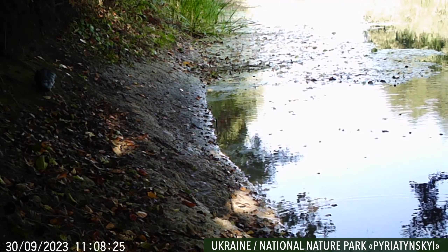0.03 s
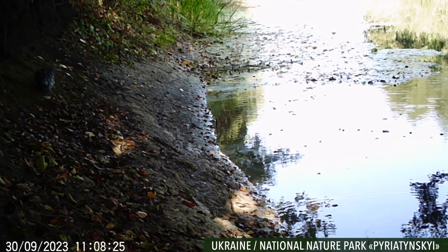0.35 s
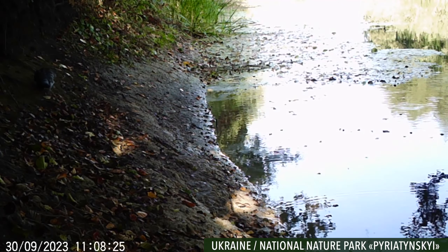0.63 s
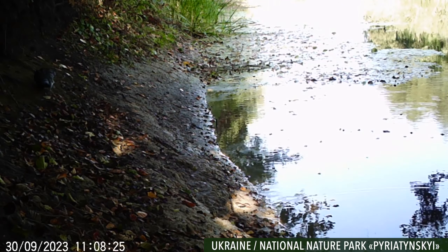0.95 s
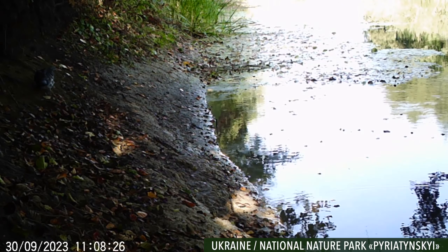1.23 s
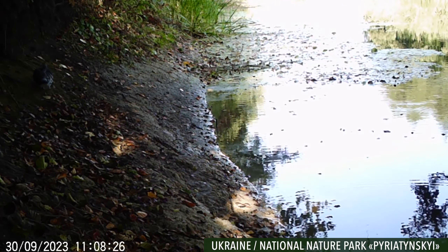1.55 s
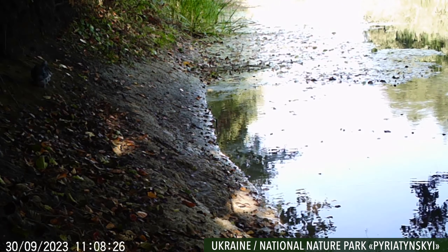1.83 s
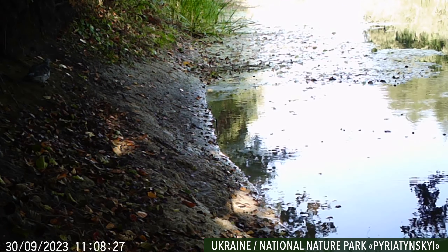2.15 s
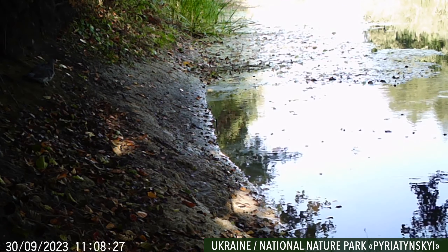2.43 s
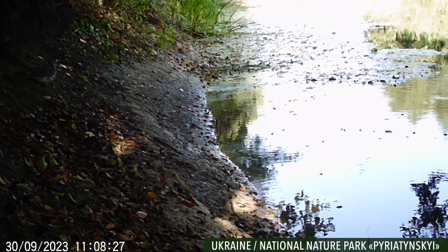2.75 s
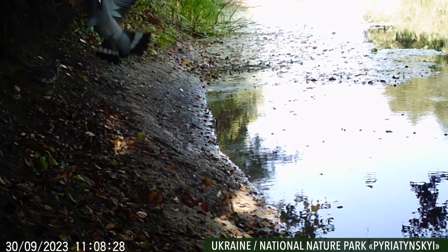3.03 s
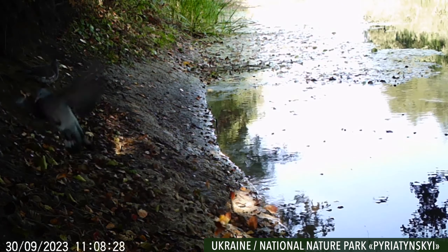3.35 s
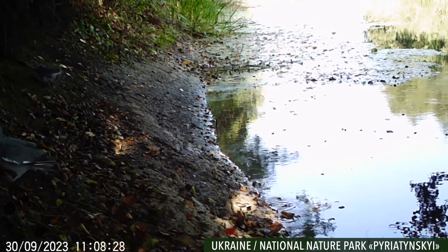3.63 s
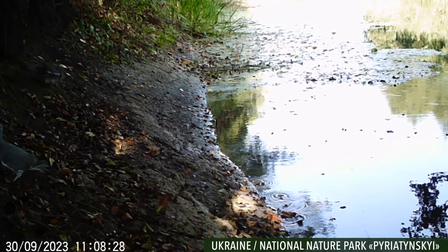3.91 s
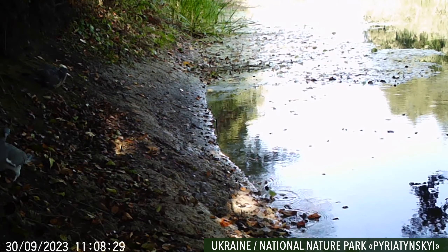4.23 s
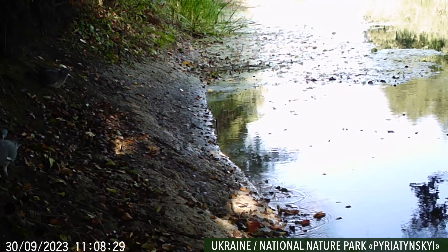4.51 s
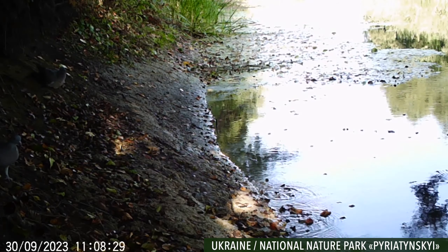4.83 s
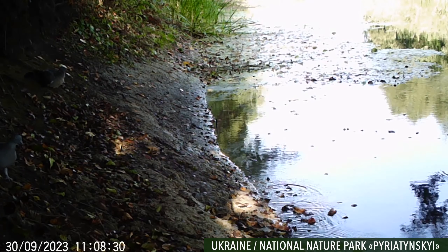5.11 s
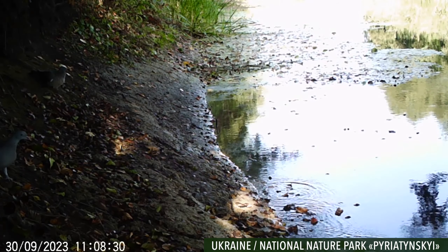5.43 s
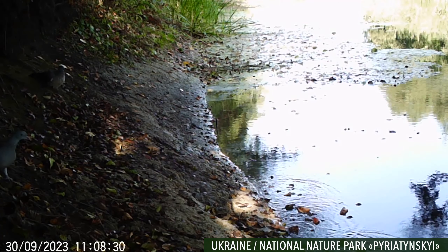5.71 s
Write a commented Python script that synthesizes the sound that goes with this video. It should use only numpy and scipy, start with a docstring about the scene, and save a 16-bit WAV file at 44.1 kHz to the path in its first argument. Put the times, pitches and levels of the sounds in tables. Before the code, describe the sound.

Pigeons stir on the leafy bank of a woodland pond. A rattling croak and faint small bird chirps come first, then stuttering croaks and dull wingbeats among snapping twigs. A bird flaps in and lands with a reedy honk, rustling dry leaves and sending grit pattering onto the water. A short yelp and a few snaps follow. A trail camera microphone adds steady hiss and a thin whine.

```python
"""Pigeons croak, coo, honk and beat their wings on the leafy bank of a woodland pond.
Their throats make rough, pulsing tones and their wings push dull gusts of air. Dry leaves
rustle and snap as they are stirred, and blown leaves and grit patter onto the water.
Small birds chirp further off. A trail camera hears it all through two unequal microphone
openings (ports), over a steady hiss, a far shrill sound and its own thin whine."""
import sys
import numpy as np
from scipy import signal
from scipy.fft import rfft, irfft, next_fast_len
from scipy.io import wavfile
from scipy.ndimage import uniform_filter1d

SR = 44100
rng = np.random.default_rng(int(sys.argv[2]) if len(sys.argv) > 2 else 0)


def to_wav(s):
    """Save 16-bit WAV."""
    ch = np.atleast_2d(s).T  # columns
    pcm = np.round(np.clip(ch, -1, 1) * 32767)  # PCM
    wavfile.write(sys.argv[1], SR, pcm.astype(np.int16))


N = 258867
T = np.arange(N) / SR


def undb(db):
    """Turn decibels into a number to multiply by."""
    return 10 ** (np.asarray(db) / 20)


def unit(x):
    """Scale a signal to an average power of 1."""
    return x / np.sqrt(np.mean(x ** 2))


def cut(x, kind, hz, order):
    """Filter a signal: "low", "high" and "band" keep that part, "bandstop" removes it."""
    return signal.sosfilt(signal.butter(order, hz, kind, fs=SR, output="sos"), x)


def colour(x, points):
    """Shape the tone along (pitch_hz, level_db) points, with a filter that rings only after a click."""
    hz, db = np.transpose(points)
    size = next_fast_len(N + SR // 2, True) // 2 * 2
    gain = unit(undb(np.interp(np.log(np.fft.rfftfreq(size, 1 / SR) + 1), np.log(hz), db)))
    cepstrum = irfft(np.log(gain))
    cepstrum[1:size // 2] *= 2
    cepstrum[size // 2 + 1:] = 0
    return irfft(rfft(x, size) * np.exp(rfft(cepstrum)))[..., :N]


def ring(x, hz, width_hz):
    """Let a signal ring at one pitch; the narrower the width, the longer it rings."""
    return signal.lfilter(*signal.iirpeak(min(hz, SR / 3), hz / width_hz, fs=SR), x)


def wander(per_s):
    """A random drift of about 1 either way, heading for a new value per_s times a second."""
    return unit(np.interp(T * per_s, np.arange(N // 10), rng.standard_normal(N // 10)))


def swell(start_s, length_s, rise_s, fade_s):
    """A loudness curve that rises, holds, then fades away."""
    age = T - start_s
    return np.clip(age / rise_s, 0, 1) * np.exp(-np.maximum(age - length_s, 0) / fade_s)


def add(track, start_s, x):
    """Mix a sound into the track at its start time."""
    i = max(int(start_s * SR), 0)
    track[..., i:i + x.shape[-1]] += x[..., :N - i]


def place(x, pan_db):
    """Both ports share the left's bass; the right is then pan_db quieter (louder if negative)."""
    left, right = x * np.ones((2, N))
    right = right + cut(left - right, "low", 1100, order=1)
    return np.array([left, right * undb(-pan_db)])


def tiny_cracks(size, spread_db, density):
    """Cracks of very unequal strength: a shared stream plus one for each port."""
    cracks = rng.standard_normal((3, size)) * (rng.random((3, size)) < density) / np.sqrt(density)
    cracks *= undb(spread_db * np.minimum(rng.exponential(size=(3, size)), 4))
    return unit(cracks[0] + 2.25 * cracks[1:])


def ringing_ticks(low_hz, high_hz, width_hz, density, count=44):
    """Scattered ticks, each ringing at one of several random pitches."""
    pitches = low_hz * (high_hz / low_hz) ** ((np.arange(count) + rng.random(count)) / count)
    rings = (ring(rng.standard_normal(N) * (rng.random(N) < density), hz, width_hz) for hz in pitches)
    return unit(sum(rings) + 1e-12)


def throat(rows, pulses_per_s, depth, sag, overtone_db, jitter):
    """A pulsing throat tone that follows (time_s, pitch_hz, level_db) rows and sags in each pulse."""
    times, pitches, levels = np.transpose(rows)
    hz, db = np.interp(T, times, pitches), np.interp(T, times, levels)
    sounding = uniform_filter1d(1. * ((T > times[0]) & (T < times[-1])), SR // 1000)
    flutter = 2 * np.pi * np.cumsum(pulses_per_s * sounding) / SR
    phase = 2 * np.pi * np.cumsum(hz * (1 - sag * np.sin(flutter) + jitter * wander(480))) / SR
    tone = sum(undb(overtone_db * k) * np.sin((k + 1) * phase) for k in range(3))
    pulses = np.exp(depth * (np.cos(flutter) - 1))
    return tone * pulses * undb(db) * sounding


# The tone of the hiss, from bass to treble: pitch_hz, relative_level_db
HISS_TONE = [(40, -32), (80, -3.5), (130, 3), (350, 6), (700, 4.5), (970, 9), (1400, -0.5), (2400, -4.5),
             (3400, -3.5), (4500, -0.5), (6000, -6), (7000, 2), (8800, 3.5), (10300, -1.5), (12500, -8),
             (15500, -14)]
# How much quieter the hiss is on the right: pitch_hz, quieter_db
HISS_BALANCE = [(60, 11.5), (400, 8), (1000, 19), (2400, 11.5), (8000, 12.5), (15000, 19)]

def hiss(level_db=-41):
    """A steady hiss, alike at both ports only in the bass."""
    own_treble = cut(rng.standard_normal((2, N)), "high", 2500, order=1)
    shared = rng.standard_normal(N)
    noise = colour(shared + own_treble + .15 * rng.standard_normal((2, N)), HISS_TONE)
    noise *= undb(level_db + .79 * wander(27)) / noise[0].std()
    quieter_db = np.interp(np.fft.rfftfreq(N, 1 / SR), *np.transpose(HISS_BALANCE))
    return np.array([noise[0], irfft(rfft(noise[1]) * undb(-quieter_db), N)])


def whine(pitch_hz=5512, level_db=-50.5):
    """The camera's electronics give one thin, steady tone."""
    return place(undb(level_db) * np.sin(2 * np.pi * pitch_hz * T), pan_db=15)


def shrill(pitch_hz=6770, width_hz=620, level_db=-45.5, end_s=4.9):
    """A high, flickering band of noise from far off, perhaps insects; it fades out near the end."""
    band = ring(ring(rng.standard_normal(N), pitch_hz, width_hz), pitch_hz, 2 * width_hz)
    flickering = unit(band * undb(2.3 * wander(24)))
    fade = np.clip((end_s - T) * 2, 0, 1)
    return place(flickering * undb(level_db) * fade, pan_db=31)


# Small birds in the trees: start_s, length_s, start_hz, end_hz, level_db, buzz (share of the pitch)
BIRD_CHIRPS = [(0.0, 0.034, 4160, 4300, -30, 0.02), (0.238, 0.033, 2720, 3080, -35, 0.066),
               (0.267, 0.066, 3750, 4430, -35, 0.014), (0.992, 0.065, 7760, 6990, -27, .02),
               (2.302, 0.034, 3910, 3770, -28, 0.012)]

def chirps():
    """Thin whistles that slide quickly, then settle on their last pitch; a fast waver adds buzz."""
    out, waver = np.zeros(N), wander(600)
    for start_s, length_s, start_hz, end_hz, db, buzz in BIRD_CHIRPS:
        size = int(length_s * SR)
        slide_hz = end_hz + (start_hz - end_hz) * np.linspace(1, 0, size) ** 2
        phase = 2 * np.pi * np.cumsum(slide_hz * (1 + buzz * waver[:size])) / SR
        add(out, start_s, undb(db) * np.sqrt(np.hanning(size)) * np.sin(phase))
    return place(out, pan_db=13)


# The path of one rattling croak: time_s, pitch_hz, level_db
RATTLE_PATH = [(0.093, 892, -32), (0.125, 917, -22.5), (0.165, 890, -18), (0.2, 843, -19.5),
               (0.28, 822, -38)]

def rattle():
    """The throat chops an almost pure tone into deep pulses."""
    return throat(RATTLE_PATH, pulses_per_s=85, depth=1.1, sag=.1, overtone_db=-49, jitter=.0357)


# The loudest leaves and twigs that snap: start_s, level_db, pitch_hz, rise_s, fade_s (to fall 60 dB)
TWIG_SNAPS = [(0.445, -30.5, 4700, .003, 0.042), (1.036, -29, 2930, .003, 0.033),
              (1.0645, -19, 4350, 0.0079, 0.037), (1.069, -25.5, 2630, .004, .02),
              (1.1188, -15.5, 4700, 0.00098, 0.058), (1.167, -26.5, 4160, .004, 0.062),
              (1.25, -29, 2560, 0.0071, 0.089), (1.272, -25, 4000, 0.011, 0.1),
              (1.650, -20.5, 5600, .003, 0.035), (2.2619, -20, 1700, 0.00089, 0.012),
              (2.621, -17, 4500, .008, 0.068), (2.648, -15, 8400, .001, 0.019),
              (2.744, -22, 7700, .001, .01), (2.924, -21, 5400, .003, .03), (3.018, -15, 4670, .006, .035),
              (3.128, -14.5, 4850, .01, 0.031), (3.612, -10.5, 8600, .002, 0.01),
              (3.786, -14.5, 4600, .002, 0.046), (4.272, -16, 4150, .009, 0.031),
              (4.3603, -20, 3300, 0.00076, 0.0063), (4.802, -17, 5350, .001, 0.023),
              (4.878, -26, 4600, .002, 0.014), (4.9207, -23, 2930, 0.002, 0.043),
              (5.053, -22, 5500, .001, 0.032), (5.316, -35.5, 2900, 0.0027, .03),
              (5.503, -35, 2030, .002, .016), (5.594, -22, 2750, 0.0034, 0.021),
              (5.611, -18, 6920, .006, 0.091), (5.6688, -21, 3000, 0.00133, 0.032),
              (5.679, -22, 3750, .001, 0.0067), (5.716, -32, 1770, .003, .02),
              (5.7363, -16.5, 3400, .0013, .024)]
# The tones that ring in each snap: pitch_ratio (times the snap's pitch), relative_level_db
SNAP_TONES = [(.68, -6), (.88, 1), (1.06, 15.5), (1.58, 2.5), (1.85, 1)]

def snaps(settle_db=-15, settle_s=.33, width_share=.076, detune=.037):
    """A leaf or twig gives way: cracks build up, ring and fade, then the fallen leaves settle."""
    out, t = np.zeros((2, N)), T[:SR // 6]
    for start_s, db, hz, rise_s, fade_s in TWIG_SNAPS:
        rise, age = np.minimum(t / rise_s, 1) ** 2, np.maximum(t - rise_s, 0)
        burst = tiny_cracks(len(t), spread_db=3, density=.55) * rise * undb(-60 * age / fade_s)
        settling = tiny_cracks(len(t), spread_db=5, density=.77) * rise
        settling *= undb(settle_db - 60 * age / settle_s)
        # the quicker the rise, the harder the first crack
        burst[:, int(rise_s * SR)] += undb(17) * np.exp(1 - rise_s / .00087)
        pitches = hz * (1 + detune * (2 * rng.random(len(SNAP_TONES)) - 1))
        tones = sum(undb(tone_db) * ring(burst + settling / 2, ratio * pitch, width_share * pitch)
                    for (ratio, tone_db), pitch in zip(SNAP_TONES, pitches))
        cracks = ring(burst + settling, hz, width_hz=hz)
        snap = cut(unit(tones) + undb(-6) * unit(cracks), "band", [1300, 9500], order=4)
        loudest = np.sqrt(uniform_filter1d(snap[0] ** 2, SR // 500).max())
        add(out, start_s, snap * undb(db) / loudest)
    return place(out, pan_db=10)


# Feet and wings scuff the leaves: start_s, length_s, level_db, brightness_db
LEAF_SCUFFS = [(1.075, 0.083, -34.5, -5), (1.251, 0.053, -32.5, -8), (1.575, 0.24, -31, -7.5),
               (1.84, 0.2, -34, -8), (2.124, 0.15, -34, -20), (2.534, 0.1, -31.5, 7),
               (2.589, 0.12, -29.5, 8), (2.702, 0.071, -31.5, -8), (2.825, 0.11, -26.5, -1.5),
               (2.915, 0.12, -18.7, -0.5), (3.067, 0.069, -26, -8), (3.184, 0.087, -29, -9),
               (3.325, 0.11, -21, -8.5), (3.45, 0.091, -27.5, 2), (3.562, 0.13, -25.5, -1.5),
               (3.688, 0.15, -24, -8.5), (3.867, 0.14, -20.5, -19), (4.128, 0.055, -29.5, -11),
               (4.241, 0.07, -27, -9), (4.495, 0.049, -32, -2), (4.608, 0.034, -33.5, -10),
               (4.899, 0.053, -36.5, -23), (5.728, 0.019, -37, -14)]

def stirring(wing_force):
    """Scuffs, shuffling feet and the draught of the wings set the rustle's strength and brightness."""
    parts = [(undb(db) * swell(start_s, length_s, rise_s=.024, fade_s=.029), bright_db)
             for start_s, length_s, db, bright_db in LEAF_SCUFFS]
    shuffle = undb(-39.5) * swell(start_s=1.4, length_s=3.44, rise_s=.024, fade_s=.36)
    draught = undb(-8.5) * wing_force
    parts += [(shuffle, -2.5), (draught, -10)]
    power = sum(gain ** 2 for gain, _ in parts) + 1e-18
    return np.sqrt(power), sum(gain ** 2 * bright_db for gain, bright_db in parts) / power


# The tone of dry leaves: pitch_hz, relative_level_db
LEAF_TONE = [(820, -36), (1400, -17), (2670, -1), (3450, -3), (4170, -4), (4940, 1), (5450, -8.5),
             (6650, 0), (7420, -3), (9040, -1), (9800, -2.5), (10600, -1), (11500, -9.5), (12800, -11.5),
             (13900, -15.5), (15000, -85)]

def rustle(wing_force, flurry_limit_db=7.5):
    """Dry leaves crackle in uneven flurries; single leaves ring, and stiff ones crunch one by one."""
    strength, bright_db = stirring(wing_force)
    blades = ringing_ticks(low_hz=2200, high_hz=10000, width_hz=150, density=.0015)
    # gentle stirring breaks up into separate cracks
    cracks = tiny_cracks(N, spread_db=2.6, density=.002 + 1.3 * strength)
    crunch = ringing_ticks(low_hz=3800, high_hz=4800, width_hz=330, density=.0007, count=6)
    crackle = colour(cracks + undb(-1) * blades, LEAF_TONE) + undb(-8) * crunch
    top, body = cut(crackle, "high", 6500, order=2), cut(crackle, "low", 6000, order=2)
    bright = undb(bright_db + 5)
    # the two halves swing opposite ways where they meet, so subtracting joins them
    stirred = (unit(body) - bright * unit(top)) / np.sqrt(1 + bright ** 2)
    lumps_db = 1.7 * wander(90) + 1.5 * wander(39)
    flurries = unit(undb(flurry_limit_db * np.tanh(lumps_db / flurry_limit_db)))
    return place(stirred * flurries * strength, pan_db=12)


# Plops at the water's edge: start_s, level_db (before boost_db), pitch_hz, length_s
WATER_PLOPS = [(1.119, -33, 523, .014), (4.85, -42, 490, 0.036), (5.09, -39.5, 574, 0.03),
               (5.628, -43, 505, 0.036)]

def plops(width_hz=260, boost_db=9):
    """Dull, rough plops: a short swell of noise rings broadly around one pitch."""
    out, t = np.zeros(N), T[:SR // 6]
    for start_s, db, hz, length_s in WATER_PLOPS:
        age = t / (length_s / 2)
        noise = rng.standard_normal(len(t)) * age * np.exp(-age)
        plop = ring(ring(noise, hz, width_hz), hz, 2 * width_hz)
        add(out, start_s, plop * undb(db + boost_db) / np.abs(plop).max())
    return out


# The loudest gruff croaks: start_s, level_db (before boost_db), pitch_hz, length_s
GRUFF_CROAKS = [(1.3605, -26, 847, 0.009), (1.375, -27.5, 878, 0.0092), (1.490, -24, 868, 0.0088),
                (1.509, -23, 886, 0.014), (1.571, -25.5, 1034, 0.0048), (1.608, -18.5, 895, 0.0091),
                (1.635, -25, 976, 0.0097), (1.681, -28, 950, 0.0061), (1.704, -24.5, 980, 0.017),
                (1.743, -22, 953, 0.0046), (1.77, -27.5, 890, 0.0041), (1.803, -23, 863, 0.003),
                (1.834, -26, 937, 0.0053), (1.926, -24.5, 883, 0.011), (1.966, -27.5, 860, 0.0052),
                (2.054, -24, 863, 0.0042), (2.082, -28.5, 940, 0.0049), (2.119, -26.5, 1093, 0.0065),
                (2.142, -23.5, 975, 0.013), (2.160, -26, 970, 0.015), (2.1975, -21, 935, 0.0049),
                (2.226, -23.5, 1060, 0.0066), (2.262, -25, 1080, 0.0042), (2.29, -24.5, 1092, 0.012),
                (2.344, -26, 814, 0.0091), (2.861, -26, 887, 0.014), (2.972, -26, 913, 0.016),
                (3.124, -30, 1097, 0.0052), (3.336, -21.5, 875, 0.013)]

def croaks(roughness=.54, jitter=.066, boost_db=11):
    """Short, shaky bursts from the throat, each with a quick rise and a weaker upper tone."""
    rows = GRUFF_CROAKS + stutter()
    out, size = np.zeros(N), SR // 8
    shake, wobble = wander(330), wander(370)
    for start_s, db, hz, length_s in rows:
        i, age = int(start_s * SR), T[:size] / (length_s / 2)
        phase = 2 * np.pi * np.cumsum(hz * (1 + jitter * wobble[i:i + size])) / SR
        tone = np.sin(phase) + undb(-12) * np.sin(1.48 * phase)
        croak = tone * age * np.exp(-age ** .86) * np.exp(roughness * shake[i:i + size])
        add(out, start_s, croak * undb(db + boost_db) / np.abs(croak).max())
    return cut(out, "high", 490, order=3)  # the throat passes little below its lowest ring


# Runs of weaker croaks between the loud ones: start_s, end_s, level_db (before the croaks' boost)
CROAK_RUNS = [(1.589, 2.05, -30.5), (2.21, 2.39, -30.5), (2.546, 2.7, -36.5)]

def stutter(gap_s=.022, pitch_hz=998, length_s=.0076):
    """List quick, weak croaks, each a little off in time, level and pitch."""
    rows = []
    for start_s, end_s, db in CROAK_RUNS:
        for beat_s in np.arange(start_s, end_s, gap_s):
            late, louder_db, higher = rng.standard_normal(3)
            time_s = beat_s + gap_s * np.tanh(late) / 2
            rows.append((time_s, db + louder_db, pitch_hz * (1 + .1203 * higher), length_s))
    return rows


# Single beats of the wings: peak_s, level_db (before the wings' boost)
WING_STROKES = [(1.596, -32.5), (1.656, -28), (1.702, -36), (1.767, -28), (1.807, -30.5), (1.88, -35),
                (1.924, -35), (2.008, -37.5), (2.105, -32), (2.159, -28.5), (2.222, -28), (2.351, -34.5),
                (2.394, -33), (3.028, -36), (3.134, -37), (3.257, -34), (3.295, -35), (3.331, -22.5),
                (3.376, -23.5), (3.423, -22), (3.56, -40)]

def wingbeats(stroke_s=.04):
    """The force of the wings: each stroke swells and fades, and leaves the air swirling."""
    power = np.zeros(N)
    for peak_s, db in WING_STROKES:
        stroke = np.exp(-(2 * (T - peak_s) / stroke_s) ** 2)
        swirl = undb(-10.5) * swell(peak_s - stroke_s, stroke_s, rise_s=stroke_s, fade_s=.12)
        power += (stroke ** 2 + swirl ** 2) * undb(db) ** 2
    return np.sqrt(power)


# The tone of air pushed by wings: pitch_hz, relative_level_db
WING_TONE = [(30, -42), (60, -15), (90, -5.5), (140, -6.5), (220, -7), (330, -6.5), (430, -9.5), (700, -6),
             (1000, 1.5), (1300, -5), (2200, -13), (4000, -52)]

def wings(wing_force, flight_s=2.23, boost_db=3):
    """Each stroke pushes a dull gust; air also rushes over the feathers of a bird flying in."""
    gusts = unit(colour(rng.standard_normal(N), WING_TONE) * undb(.5 * wander(17)))
    # in the air the wings lose the deep thump they have on the ground
    air = np.where(T < flight_s, gusts, cut(gusts, "high", 136, order=2))
    rush = undb(-46) * swell(flight_s, length_s=2.07, rise_s=.69, fade_s=.72)
    return place(air * np.hypot(wing_force, rush) * undb(boost_db), pan_db=8)


# The path of one hoarse coo: time_s, pitch_hz, level_db (before the flicker)
COO_PATH = [(2.26, 679, -28), (2.28, 560, -19.5), (2.3, 554, -16), (2.32, 678, -19.5), (2.335, 634.4, -31),
            (2.42, 606, -33.5)]

def coo():
    """A low throat tone, made hoarse by a shaky pitch and a flickering level."""
    tone = throat(COO_PATH, pulses_per_s=72, depth=.076, sag=.06, overtone_db=-9, jitter=.085)
    return tone * undb(2.5 * wander(300) - .5)


# The tone of leaves and grit landing on water: pitch_hz, relative_level_db
PATTER_TONE = [(60, -39), (330, -1), (1400, -15), (2600, 0.5), (3300, -0.5), (4250, 8.5), (5500, 1),
               (6700, -5), (8200, -7), (8900, 10), (9500, -15), (10500, 3), (15000, -68)]

def patter(start_s=2.58, peak_s=3.953, grow_db_per_s=7, fall_db_per_s=35, right_db=-23.5, pan_db=-5):
    """Blown leaves and grit tick on the water to the right, thickest as the bird lands."""
    swing_db = np.minimum(grow_db_per_s * (T - peak_s), fall_db_per_s * (peak_s - T))
    droplets = ringing_ticks(low_hz=2000, high_hz=9000, width_hz=150, density=.00035)
    ticks = tiny_cracks(N, spread_db=2.2, density=.003 + .09 * undb(swing_db) ** 2)
    spray = colour(ticks + undb(-3.5) * droplets, PATTER_TONE)
    spray = unit(spray * undb(2.16 * wander(180)))
    fade_in = np.clip((T - start_s) / .019, 0, 1)
    return place(spray * undb(right_db + pan_db + swing_db) * fade_in, pan_db)


# Larger bits of grit falling in the pond: start_s, level_db (before boost_db), pitch_hz
GRIT_PLINKS = [(3.15, -9.5, 4420), (3.717, -19, 4170), (3.928, -15, 4100), (3.954, -12, 6630),
               (3.977, -11, 6760), (3.992, -8, 3940), (4.076, -20, 4300), (4.116, -19, 6530),
               (4.1953, -18.5, 4070), (4.254, -10, 3070), (4.305, -15, 4460), (4.537, -28, 6700),
               (4.627, -23, 6780)]

def plinks(ring_s=.0017, boost_db=2):
    """Grit hits the water: each bit gives a short, pitched plink with four weaker side tones."""
    out, t = np.zeros(N), T[:SR // 20]
    age = t / ring_s
    for start_s, db, hz in GRIT_PLINKS:
        side_hz = hz * 2 ** rng.uniform(-.8, .7, (4, 1))
        tones = np.sin(2 * np.pi * hz * t) + .28 * np.sin(2 * np.pi * side_hz * t).sum(0)
        plink = tones * age / (1 + age ** 2) ** 1.5 * np.exp(-age / 10)
        add(out, start_s, plink * undb(db + boost_db) / np.abs(plink).max())
    return place(out, pan_db=5)


# The honk's tones at 1, 2 and 3 times its pitch: relative_level_db
HONK_TONES = [-8.5, -6, -14.5]
# How the throat rings at each flap: pitch_hz, length_s, relative_level_db
THROAT_RINGS = [(700, 0.0084, -7), (1230, 0.0055, 4), (1810, 0.0029, 3)]

def honk(pitch_hz=572.6, first_flap_s=3.433, cycles_per_flap=11):
    """A steady reedy note rattles as a slower flap sets the throat ringing."""
    since = T - first_flap_s
    # each higher tone trails the one below by a quarter turn
    note = sum(undb(db) * np.cos(2 * np.pi * (k + 1) * pitch_hz * since - np.pi / 2 * k)
               for k, db in enumerate(HONK_TONES))
    flap_s = cycles_per_flap / pitch_hz
    age = (since + flap_s / 2) % flap_s - flap_s / 2  # seconds from the nearest flap
    for hz, length_s, db in THROAT_RINGS:
        pulse = np.exp(-np.abs(2 * age / length_s) ** np.sqrt(2)) * (since > -flap_s / 2)
        note += undb(db) * pulse * np.sin(2 * np.pi * hz * age)
    hoarse = 1 + .17 * wander(400)
    loudness = undb(-15) * swell(start_s=3.402, length_s=.17, rise_s=.0096, fade_s=.016)
    return place(note * hoarse * loudness, pan_db=7)


# The path of one short yelp: time_s, pitch_hz, level_db
YELP_PATH = [(4.426, 1297, -33), (4.445, 1202, -29), (4.455, 1200, -17), (4.465, 1240, -33),
             (4.472, 1233, -12.5), (4.486, 1150, -19.5), (4.493, 1300, -24), (4.53, 1236, -39)]

def yelp():
    """Two shaky voices at once, the second higher and weaker, make the yelp hoarse."""
    second = [(time_s, hz * 1.22, min(db, -29) - 3.5) for time_s, hz, db in YELP_PATH]
    return sum(throat(rows, pulses_per_s=50, depth=.18, sag=.015, overtone_db=-20, jitter=.075)
               for rows in (YELP_PATH, second))


def woodland(x, echo_db, fade_s):
    """Trunks and the bank scatter a short, thin echo that falls 60 dB in fade_s."""
    t = T[:SR // 2]
    echo = rng.standard_normal(len(t)) * undb(-60 * t / fade_s) * (t > .004)
    return x + undb(echo_db) * signal.fftconvolve(x, echo[None] / np.linalg.norm(echo), axes=1)[:, :N]


# Dips that the camera's case leaves in the treble: pitch_hz, width_hz, depth (0 to 1)
CASE_DIPS = [(5420, 180, 0.78), (9940, 190, 1)]

def camera_case(x):
    """The camera's case swallows two narrow bands of treble."""
    for hz, width_hz, depth in CASE_DIPS:
        x = x - depth * ring(x, hz, width_hz)
    return x


def scene():
    """Mix the pigeons, leaves, water and small birds with their echoes and the steady background."""
    wing_force = wingbeats()
    croaking = woodland(place(croaks() + coo(), pan_db=12), echo_db=-9, fade_s=.24)
    near = place(rattle() + plops() + yelp(), pan_db=13.5) + honk()
    near += rustle(wing_force) + wings(wing_force) + patter() + plinks()
    bank = woodland(near, echo_db=-14, fade_s=.2) + woodland(snaps(), echo_db=-20, fade_s=.15)
    trees = woodland(chirps(), echo_db=-6, fade_s=.42)
    left, right = camera_case(bank) + croaking + trees + hiss() + whine() + shrill()
    right = right - ring(right, hz=7870, width_hz=580)  # the right port has a dip of its own
    return np.array([left, right])


def record(dry, lag_samples=21, ceiling=.75, top_hz=15600):
    """The right side runs a little late, peaks are rounded, the treble dips and the very top is cut."""
    late = np.array([dry[0], np.pad(dry[1], (lag_samples, 0))[:N]])
    rounded = late / (1 + (late / ceiling) ** 4) ** .25
    dipped = cut(rounded, "bandstop", [10800, 12100], order=2)
    return signal.sosfilt(signal.ellip(10, .2, 80, top_hz, fs=SR, output="sos"), dipped)


dry = scene()
out = record(dry)
to_wav(out)
```